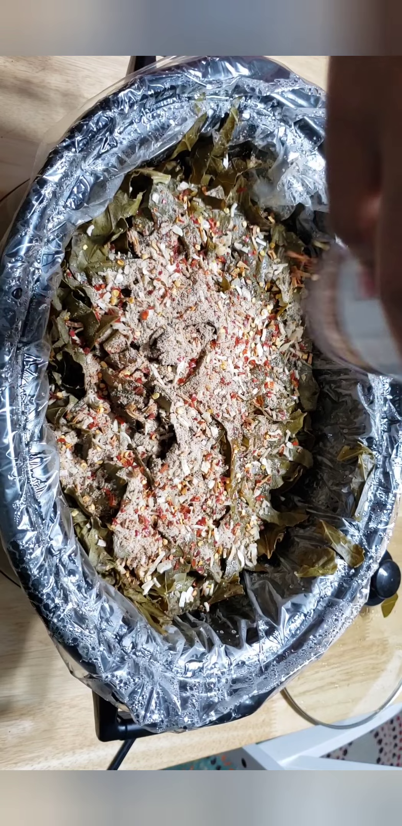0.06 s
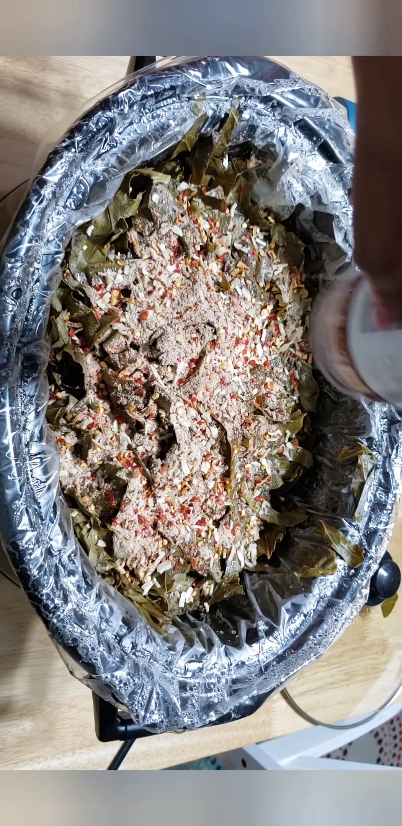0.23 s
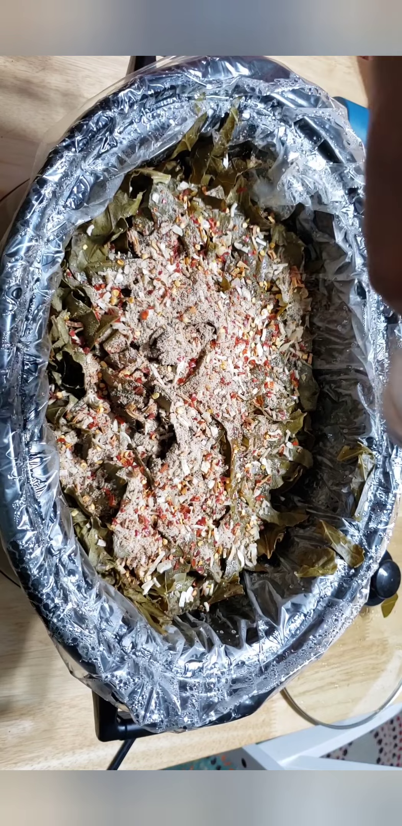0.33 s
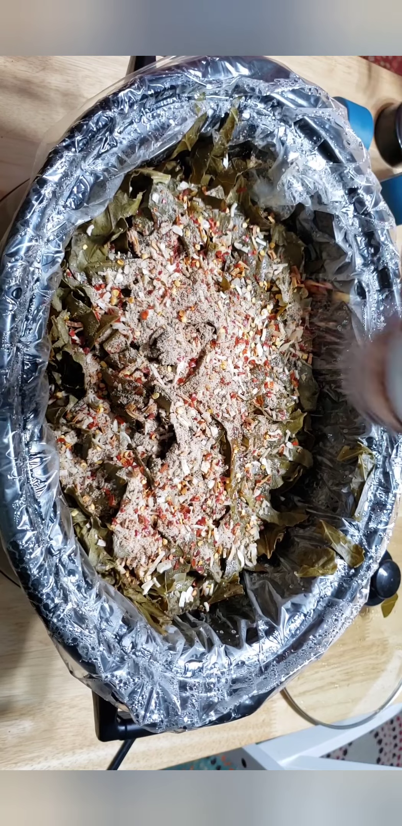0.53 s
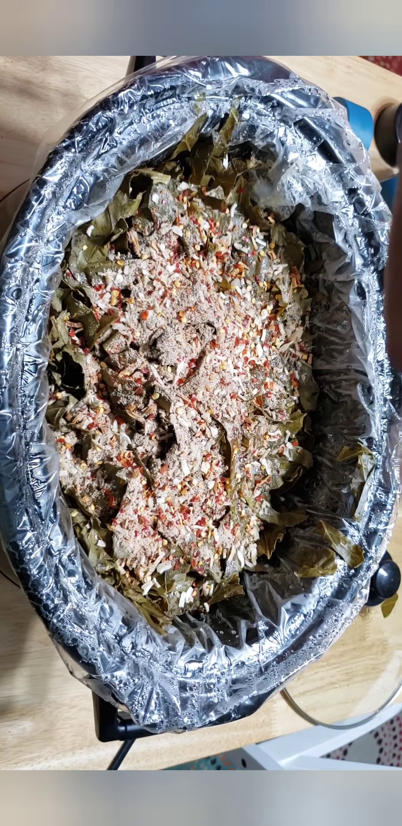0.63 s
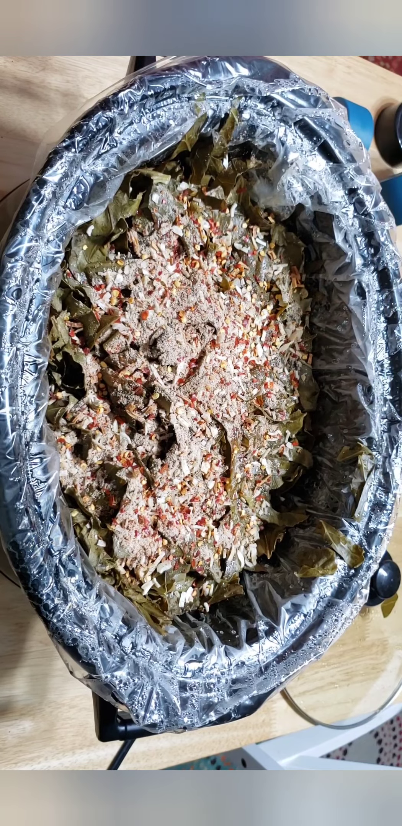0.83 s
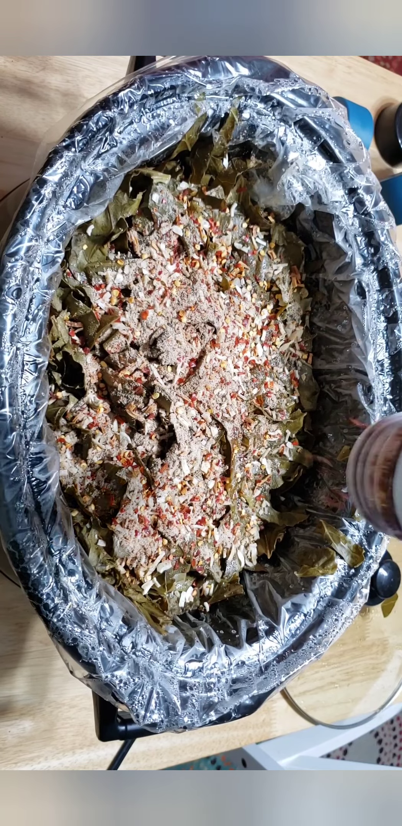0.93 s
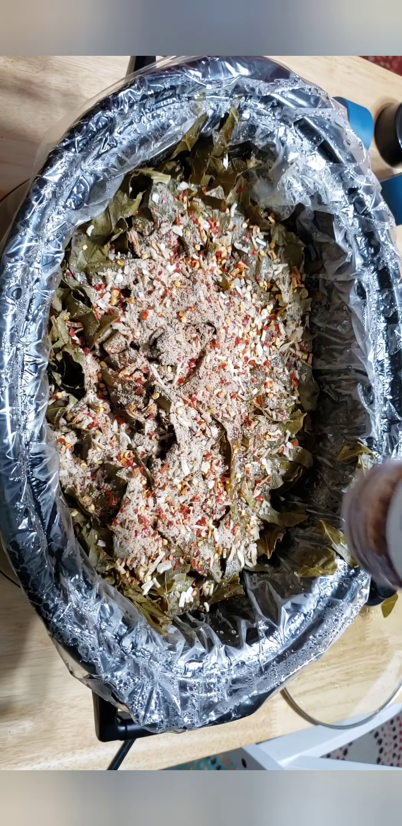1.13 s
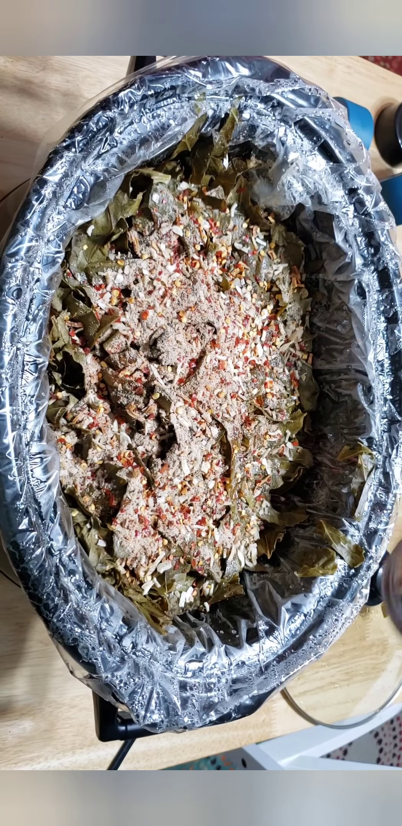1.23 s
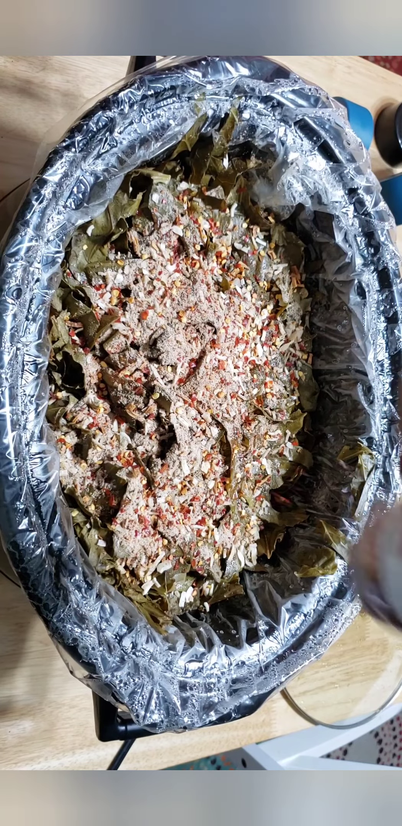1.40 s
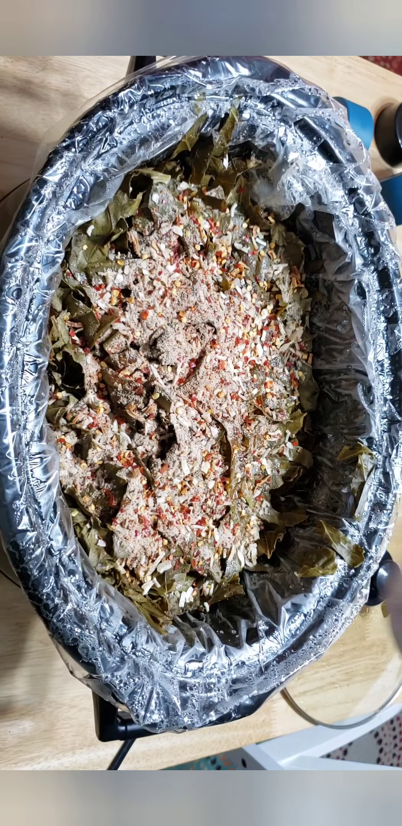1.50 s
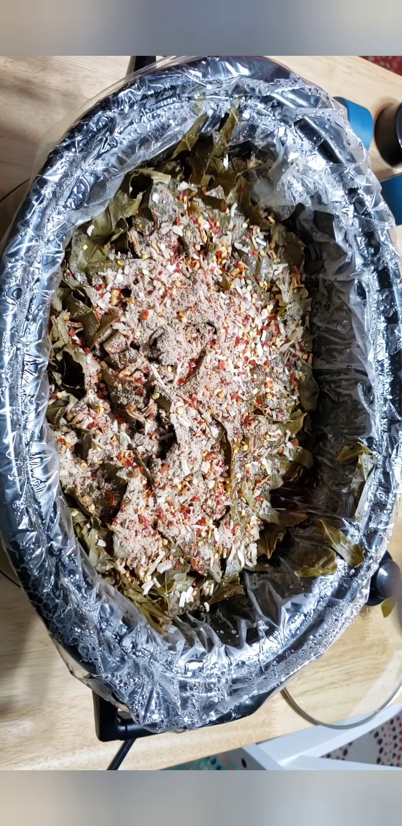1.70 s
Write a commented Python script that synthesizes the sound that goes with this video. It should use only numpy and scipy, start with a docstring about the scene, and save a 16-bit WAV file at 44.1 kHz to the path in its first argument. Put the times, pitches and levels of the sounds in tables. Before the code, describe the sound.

Close, crisp spice shaker with about five swishing strokes a second, louder at first then softer; two distant double knocks ring through the room early, and a faint low rumble passes midway over quiet room noise.

```python
"""Over a quiet room floor, a small plastic jar of dry spice flakes is shaken about five times a second, to the right.
Each shake throws the flakes against the cap, then they slide back: dense noise clicks, with noise-driven
resonances for the hollow body. From 0.29 s two double knocks further off, one hollow, then one hard, ring as
decaying modes with noise cracks, echoed by the room. Near 0.93 s resonant noise swells in a faint low rumble."""
import sys
import numpy as np
from scipy import signal
from scipy.fft import rfft, irfft
from scipy.io import wavfile
from scipy.ndimage import uniform_filter1d

SR = 44100
rng = np.random.default_rng(int(sys.argv[2]) if len(sys.argv) > 2 else 0)


def attenuation_scalar(level_db):
    """Turn a level in dB into a linear amplitude multiplier (20 dB per decade)."""
    decades = np.asarray(level_db, float) / 20
    return 10 ** decades


def file_out(sig):
    """Save sig as 16-bit WAV at sys.argv[1]."""
    # one column per channel
    cols = np.atleast_2d(sig).T
    # limit, then scale
    lim = np.clip(cols, -1, 1)
    pcm = np.round(lim * 32767).astype(np.int16)
    wavfile.write(sys.argv[1], SR, pcm)


N = 77175
T = np.arange(N) / SR
HZ = np.maximum(np.fft.rfftfreq(2 * N, 1 / SR), 1)

ROOM_ALIKE_HZ = 560  # ears alike below, unrelated above
THROW_PAN_DB, RETURN_PAN_DB = -4.0, -2.8  # left over right


def shape(x, gain):
    """Multiply the spectrum by a gain given on HZ."""
    return irfft(rfft(x, 2 * N) * gain)[..., :N]


def colour(points):
    """Gain on HZ from (Hz, dB) points, straight in log frequency."""
    hz, db = np.array(points, float).T
    return attenuation_scalar(np.interp(np.log(HZ), np.log(hz), db))


def unit(x):
    """Scale to rms 1."""
    return x / np.sqrt(np.mean(x ** 2))


def highpass(corner_hz, order):
    """Zero-phase gain that falls below the corner."""
    return 1 / (1 + (corner_hz / HZ) ** order)


def ringing(hz, width_hz):
    """Band-pass gain of one resonance on HZ, 1 at the centre."""
    return 1 / (1 + 1j * (HZ / hz - hz / HZ) * hz / width_hz)


def bump(s, half_s):
    """Gaussian swell around time s."""
    return np.exp(-.5 * ((T - s) / half_s) ** 2)


def wander(smooth_s, rms_db):
    """Two gains that drift at random, as smoothed noise in dB."""
    k = int(smooth_s * SR)
    drift = uniform_filter1d(uniform_filter1d(rng.standard_normal((2, N)), k), k)
    return attenuation_scalar(rms_db * unit(drift))


def pair(a, b, alike_hz, lag_s=0.):
    """Left and right from two signals: alike in the bass, unrelated in the treble; left late by lag_s."""
    side = shape(b, np.sqrt(highpass(alike_hz, 4)))
    left = shape(a + side, np.exp(-2j * np.pi * HZ * lag_s))
    return np.array([left, a - side]) / np.sqrt(2)


def ears(left_db):
    """Level difference split evenly between left and right."""
    return attenuation_scalar(np.array([[left_db], [-left_db]]) / 2)


def floor():
    """Steady room noise with a fixed spectrum."""
    # Each row: frequency in Hz, relative density in dB.
    floor_colour = [(15, -51), (25, -1), (70, 2.5), (416, -12), (1130, -24), (1940, -47.5), (2220, -38.5),
                    (4490, -30), (7310, -7), (16000, -25.5)]
    level_db = -65.5
    noise = pair(*rng.standard_normal((2, N)), 200)
    return attenuation_scalar(level_db) * unit(shape(noise, colour(floor_colour)))


def rumble():
    """Short swells of noise in low resonances."""
    # Each row: centre in seconds, level in dB, half length in seconds, resonance in Hz, width in Hz.
    swells = [(.93, -57.5, 0.016, 145, 47), (0.94, -61.5, 0.033, 276, 48), (.915, -59.5, 0.006, 530, 140),
              (1.0, -67, 0.023, 174, 53)]
    out = np.zeros(N)
    for s, db, half_s, hz, width_hz in swells:
        noise = unit(shape(rng.standard_normal(N), ringing(hz, width_hz) ** 2))
        out += attenuation_scalar(db) * bump(s, half_s) * noise
    return out


def room(x, wet_db):
    """Echoes: convolution with noise that decays at its own rate in each octave band."""
    # Decay time of the room. Each row: frequency in Hz, t60 in seconds.
    decay = np.array([(100, 0.28), (500, 0.4), (2000, 0.49), (8000, 0.32)])
    centres_hz = 63 * 2. ** np.arange(9)
    t60_s = np.interp(np.log(centres_hz), np.log(decay[:, 0]), decay[:, 1])
    noise = pair(*rng.standard_normal((2, N)), ROOM_ALIKE_HZ)
    tail = np.zeros((2, N))
    for hz, s in zip(centres_hz, t60_s):
        band = np.clip(1 - abs(np.log2(HZ / hz)), 0, 1)
        tail += shape(noise, band) * attenuation_scalar(-60 * T / s) * (T > .003)
    tail /= np.sqrt(np.sum(tail ** 2) / 2)  # unit energy per ear
    return attenuation_scalar(wet_db) * signal.fftconvolve(np.atleast_2d(x), tail, axes=1)[:, :N]


def modal_ring(after_s, modes):
    """Struck object's modes: each swells over some cycles, then decays with rough level."""
    swell_cycles, wobble_s, wobble_db = 1.6, .015, 3.0
    phases = np.array([[0], [np.pi / 2]])  # two signals in quadrature
    ring = np.zeros((2, N))
    for hz, db, t60_s in modes:
        swell = 1 - np.exp(-after_s * hz / swell_cycles)
        envelope = attenuation_scalar(db - 60 * after_s / t60_s) * swell * wander(wobble_s, wobble_db)
        ring += envelope * np.sin(2 * np.pi * hz * after_s + phases)
    return ring / 3


def contact_crack(after_s, tone):
    """Contact noise: a decaying coloured burst without bass."""
    decay_s, low_hz, level_db = 0.0088, 500, -9
    noise = unit(shape(rng.standard_normal((2, N)), tone * highpass(low_hz, 4)))
    return attenuation_scalar(level_db) * noise * np.exp(-after_s / decay_s) * (after_s > 0)


def knocks():
    """Each blow cracks and rings one object; also returns the bare blows, coloured single clicks."""
    # Each row: start in seconds, level in dB, object (0 hollow, 1 hard).
    knock_table = [(0.2899, -17, 0), (0.3128, -22, 0), (0.4513, -9, 1), (.4565, -19.5, 1)]
    # Modes of the two objects. Each row: frequency in Hz, relative level in dB, t60 in seconds.
    hollow_modes, hard_modes = [(55, -14.5, 0.33), (142.6, -17.5, 0.77), (295.9, -7.5, 0.57),
                                (375.7, -12, 0.69), (423, -19.5, 0.55), (795, -7.5, 0.23),
                                (905, -15, 0.085), (1201, 14, 0.05), (1249, -4.5, 0.53), (1292, 0.5, 0.3),
                                (1450, -13, 0.035), (2120, -9, 0.059)], [(55, -20.5, 0.39), (131.3, -17, 0.39), (355.6, -22, 0.47),
                                                (518, 1.5, 0.049), (672, 1.5, 0.14), (943, -29.5, .05),
                                                (1202, -5.5, 0.063), (1370, -13.5, 0.3),
                                                (1730, -3.5, 0.023), (1930, -25.5, 0.017),
                                                (2367, 1.5, 0.023), (2689, -3, 0.029), (3377, -0.5, 0.017),
                                                (5390, -6, 0.05)]
    # Spectra of their cracks. Each row: frequency in Hz, relative density in dB.
    hollow_crack, hard_crack = [(35, -50.5), (60, -5.5), (200, -20), (289, -11.5), (584, -7), (1200, -5),
                                (1420, -7), (2300, -16), (5000, -30), (6500, -54.5), (11000, -120)], [(35, -41.5), (60, -6), (225, -8.5), (413, 1),
                                                      (727, -7), (1280, -1), (1510, -5.5), (2300, -6),
                                                      (9000, -18), (11700, -44), (19800, -120)]
    out, blows = np.zeros((2, N)), np.zeros(N)
    for s, db, hard in knock_table:
        modes, points = (hard_modes, hard_crack) if hard > .5 else (hollow_modes, hollow_crack)
        tone = colour(points)
        after_s = np.maximum(T - s, 0)
        out += attenuation_scalar(db) * (modal_ring(after_s, modes) + contact_crack(after_s, tone))
        click = 1. * (np.arange(N) == int(s * SR))
        blows += attenuation_scalar(db) * unit(shape(click, tone)) / np.sqrt(N)  # unit energy
    return out, blows


def flakes():
    """Dense tiny clicks of scattered size whose flow flutters."""
    flakes_per_s, scatter_db, flutter_db = 16000, 1.4, 1.8
    hit = rng.random(N) < flakes_per_s / SR
    size = attenuation_scalar(scatter_db * rng.exponential(size=N)) * rng.standard_normal(N)
    flutter = unit(uniform_filter1d(rng.standard_normal(N), size=130))
    return unit(hit * size) * attenuation_scalar(flutter_db * flutter)


def flake_pair():
    """Flake clicks at both ears, left slightly late."""
    return pair(flakes(), flakes(), alike_hz=1100, lag_s=.0001)


def throws():
    """Flakes run up, strike the cap and trickle; gives rattle power and pushes (envelope, air Hz) on the body."""
    # Each row: strike in seconds, rattle level in dB, body thump drive in dB, run-up in seconds,
    # air-space pitch in Hz.
    throw_table = [(-.012, -36.5, -40, 0.0099, 785), (0.198, -32.5, -43, 0.0089, 930),
                   (0.423, -30, -36, 0.0068, 1240), (.656, -33.5, -39, 0.009, 724),
                   (0.87, -36.5, -45, 0.011, 743), (1.09, -37.5, -47.5, 0.018, 1114),
                   (1.307, -37, -50.5, 0.013, 1094), (1.5165, -36, -51.5, 0.0063, 1058),
                   (1.734, -36, -49, 0.012, 1074)]
    impact_db = 4  # jump at the strike
    burst_s, trickle_s, trickle_db, thump_s = 0.034, 0.045, 4, 0.017
    power, pushes = np.zeros((2, N)), []
    for s, db, thump_db, run_up_s, air_hz in throw_table:
        run_up = attenuation_scalar(-impact_db) * np.exp(np.minimum(T - s, 0) / run_up_s)
        up = np.where(T < s, run_up, 1)
        after_s = np.maximum(T - s, 0)
        fall = np.exp(-after_s / burst_s) + attenuation_scalar(trickle_db) * np.exp(-after_s / trickle_s)
        fall /= 1 + attenuation_scalar(trickle_db)
        power += (attenuation_scalar(db) * up * fall * ears(THROW_PAN_DB)) ** 2
        pushes.append((attenuation_scalar(thump_db) * up ** 2 * np.exp(-after_s / thump_s), air_hz))
    return power, pushes


def returns():
    """Flakes slide back to the bottom and settle; gives rattle power and pushes on the body."""
    # Each row: centre in seconds, level in dB of slide and of settling, body hum drive in dB,
    # half length in seconds.
    return_table = [(0.068, -43.5, -50, 0.015), (0.292, -44.5, -44, 0.019), (0.519, -42.5, -49, 0.012),
                    (0.747, -45, -57, 0.017), (0.954, -45.5, -53.5, 0.028), (1.168, -46, -57, 0.021),
                    (1.391, -48, -70.5, 0.017), (1.605, -45, -58.5, 0.018)]
    settle_s, air_hz = 0.045, 790
    power, pushes = np.zeros((2, N)), []
    for s, db, hum_db, half_s in return_table:
        slide = bump(s, half_s)
        settle = np.where(T > s, np.exp(-abs(T - s) / settle_s), slide)
        power += (attenuation_scalar(db) * (slide + settle) * ears(RETURN_PAN_DB)) ** 2
        pushes.append((attenuation_scalar(hum_db) * slide, air_hz))
    return power, pushes


def body_hum(pushes):
    """Flake noise drives the hollow body's resonances and the air space above the flakes."""
    # Each row: resonance in Hz, width in Hz, relative level in dB.
    body_modes = [(774, 52, -4), (1024, 480, -4.5), (1220, 67, -2), (2212, 140, -6.5)]
    low_hz, air_width_hz, air_db = 600, 50, 6.0
    body = sum(attenuation_scalar(db) * ringing(hz, width_hz) for hz, width_hz, db in body_modes)
    body = body * (1j * HZ / low_hz) ** 2 / (1 + 1j * HZ / low_hz) ** 2
    drive = flake_pair() / np.sqrt(np.mean(abs(body) ** 2))
    hum = np.zeros((2, N))
    for push, air_hz in pushes:
        hum += shape(drive * push, body + attenuation_scalar(air_db) * ringing(air_hz, air_width_hz))
    return hum


def flake_hiss():
    """Steady flake noise with a ring in the cap; the top treble is more central."""
    # Each row: frequency in Hz, relative density in dB.
    flake_colour = [(880, -9.5), (1500, -13.5), (1890, -13.5), (3630, -6), (4950, -3.5), (7320, 2.5),
                    (9130, -2), (15100, -1), (16000, -14.5), (16500, -67.5)]
    cap_hz, cap_width_hz, cap_db = 7535, 460, -9.5
    central_hz, left_db, shared_power = 13000, 4.5, .3
    cap = 1 + attenuation_scalar(cap_db) * ringing(cap_hz, cap_width_hz)
    left, right = unit(shape(flake_pair(), colour(flake_colour) * cap))
    top = highpass(central_hz, 8)
    own = shape(left, attenuation_scalar(left_db * top) * np.sqrt(1 - shared_power * top))
    shared = shape(right, attenuation_scalar(left_db) * np.sqrt(shared_power) * top)
    return np.array([own + shared, right])


def ticks(hiss):
    """Single large flakes tick: very short decays of the hiss, treble only."""
    # Each row: start in seconds, level in dB.
    tick_table = [(0.1967, -33.5), (0.275, -36.5), (0.6566, -31), (0.739, -41.5), (0.7677, -43),
                  (.8445, -48), (0.8684, -34), (.9615, -39), (1.0845, -42.5), (1.0933, -31.5), (1.114, -32),
                  (1.1949, -42), (1.2885, -43), (1.2975, -38.5), (1.4785, -49.5), (1.4988, -33.5),
                  (1.5178, -37), (1.5177, -35), (1.732, -33.5)]
    decay_s, low_hz = 0.00081, 5000
    envelope = sum(attenuation_scalar(db) * np.exp(-abs(T - s) / decay_s) * (T > s) for s, db in tick_table)
    return shape(hiss * envelope * ears(THROW_PAN_DB), highpass(low_hz, 4))


def jar():
    """Throws and returns set how hard the flakes rattle and how much the body hums."""
    throw_power, throw_pushes = throws()
    return_power, return_pushes = returns()
    hiss = flake_hiss()
    bass_cut = np.clip(1 + 2 * np.log2(HZ / 600), 0, 1)  # fades out over the half octave below 600 Hz
    rattle = shape(hiss, bass_cut) * np.sqrt(throw_power + return_power)
    return rattle + ticks(hiss) + body_hum(throw_pushes + return_pushes)


def scene():
    """Jar close by, knocks further off, both in the room, over rumble and floor."""
    knock_wet_db, jar_wet_db = 15.5, -15.5
    far, blows = knocks()
    distant = pair(*far, ROOM_ALIKE_HZ) + room(blows, knock_wet_db)
    near = jar()
    return floor() + rumble() + distant + near + room(near[1], jar_wet_db)


def roll_off(x):
    """The treble ends steeply here."""
    return signal.sosfilt(signal.butter(12, 17070, fs=SR, output="sos"), x)


def record(dry):
    """The finished mix as it is heard."""
    return roll_off(dry)


dry = scene()
out = record(dry)
file_out(out)
```